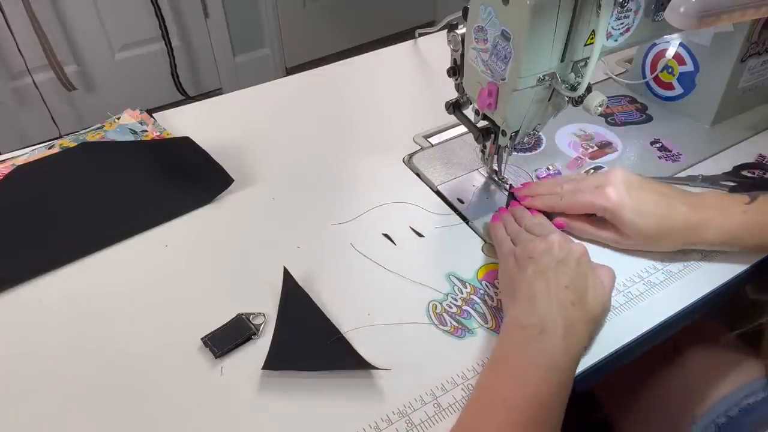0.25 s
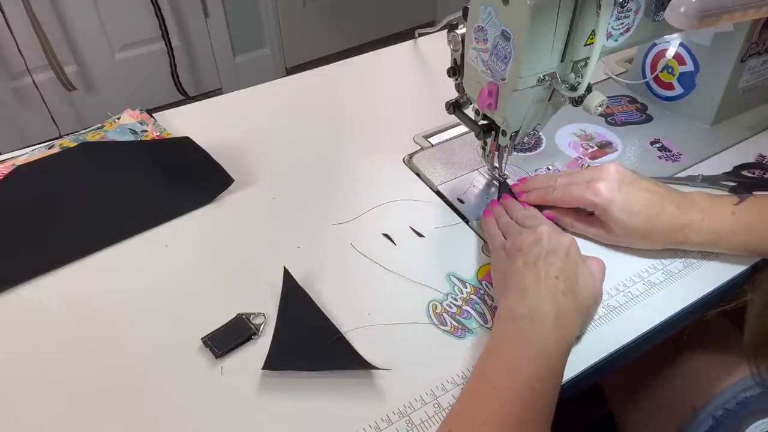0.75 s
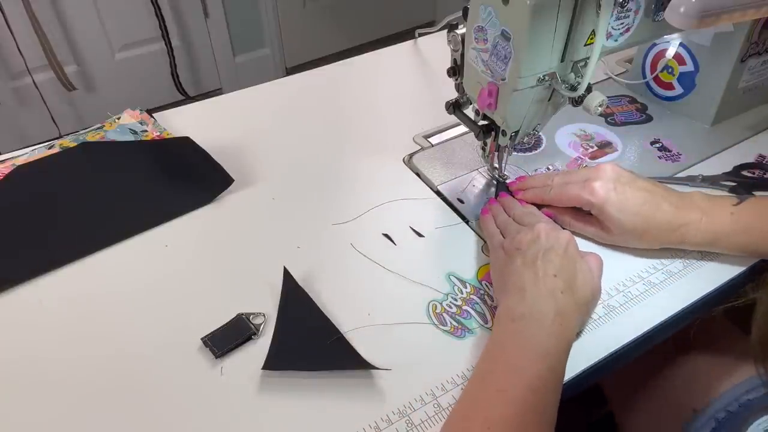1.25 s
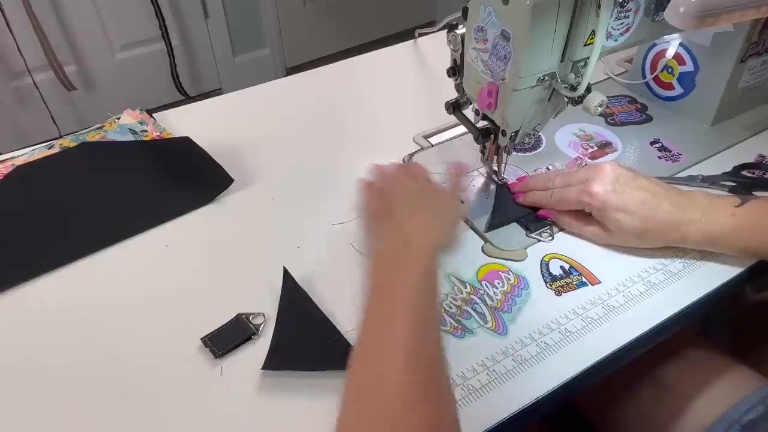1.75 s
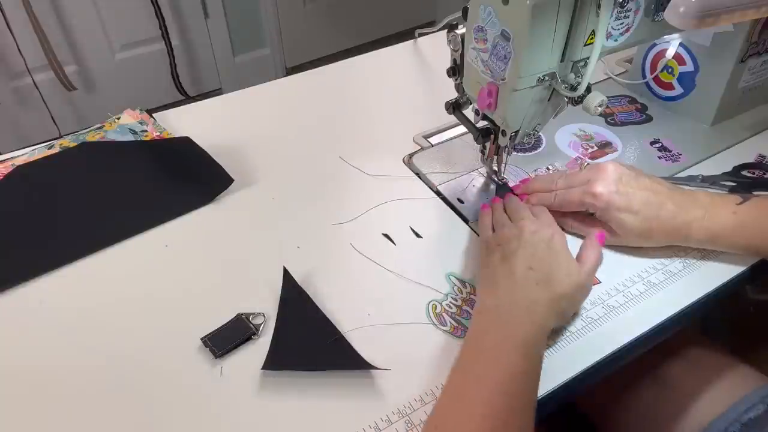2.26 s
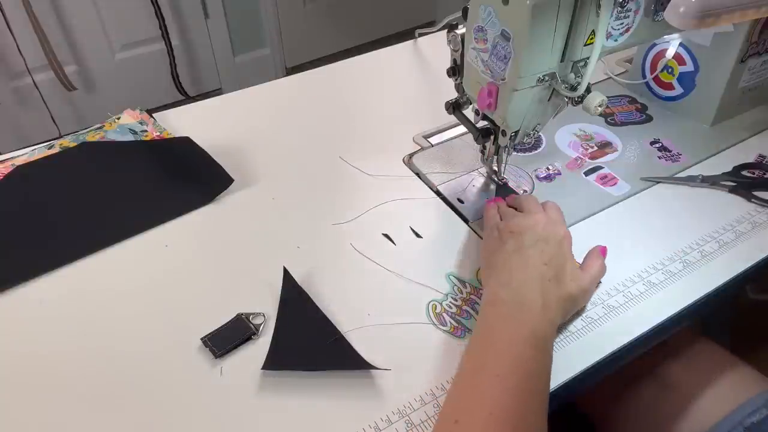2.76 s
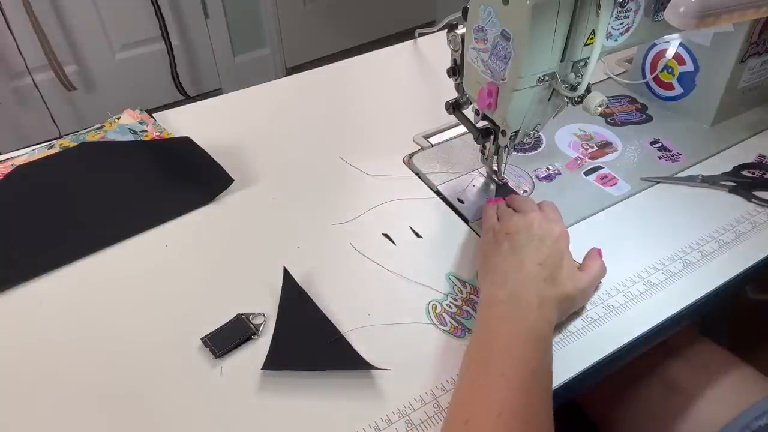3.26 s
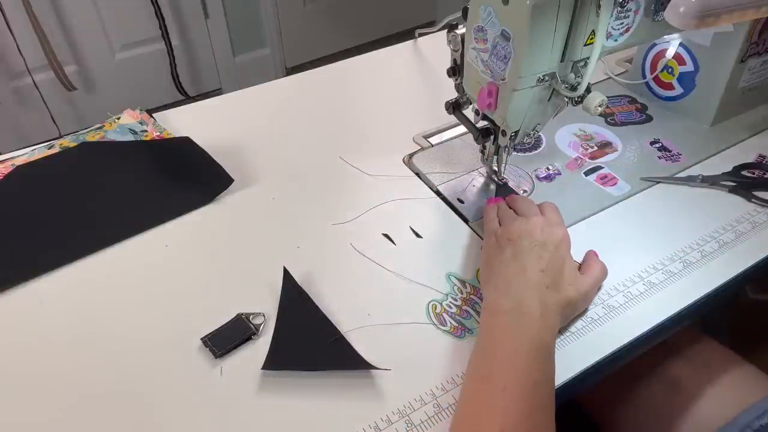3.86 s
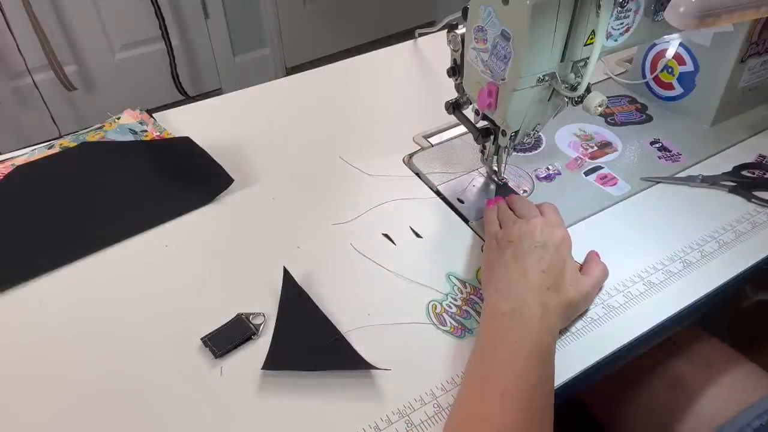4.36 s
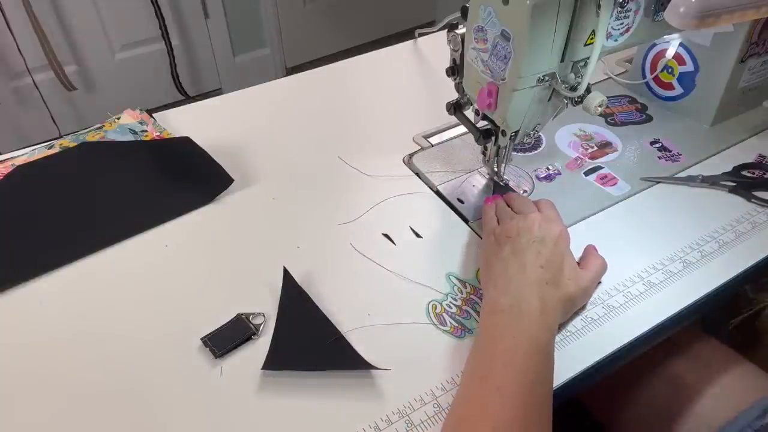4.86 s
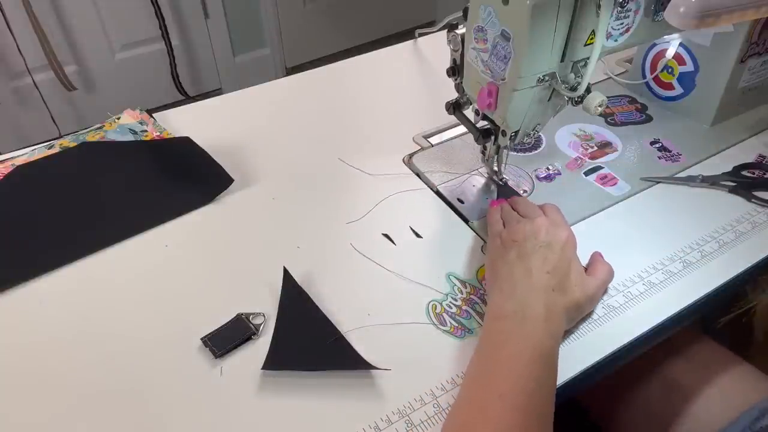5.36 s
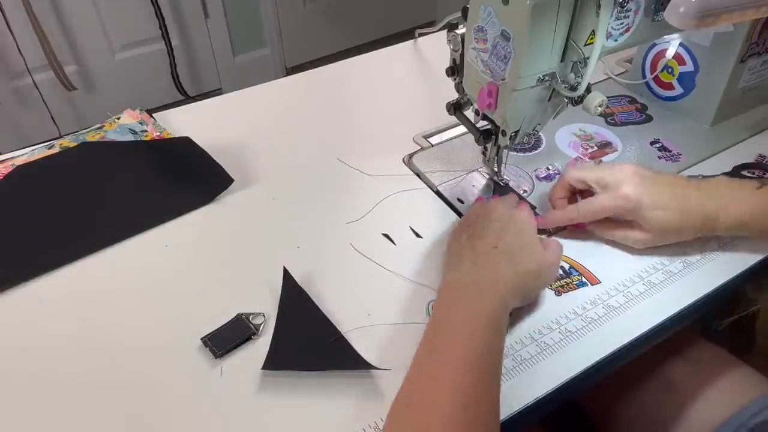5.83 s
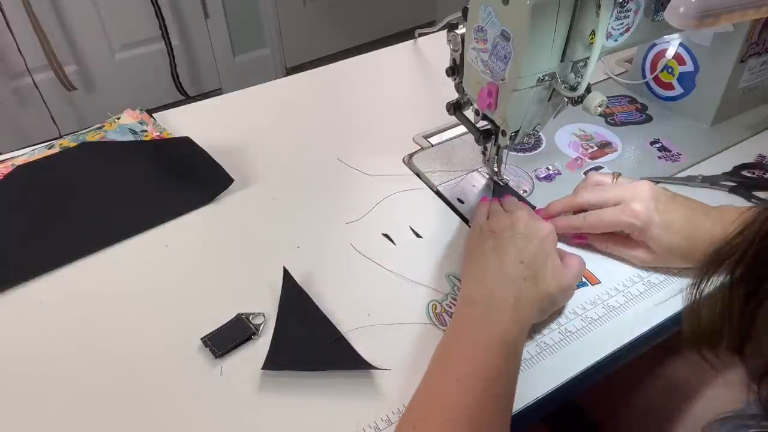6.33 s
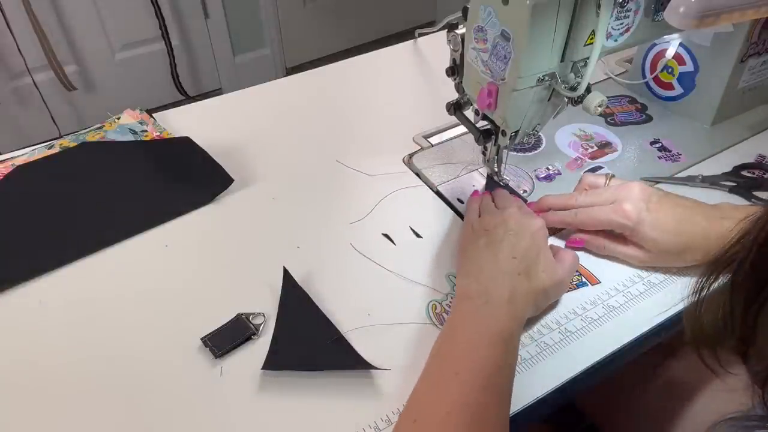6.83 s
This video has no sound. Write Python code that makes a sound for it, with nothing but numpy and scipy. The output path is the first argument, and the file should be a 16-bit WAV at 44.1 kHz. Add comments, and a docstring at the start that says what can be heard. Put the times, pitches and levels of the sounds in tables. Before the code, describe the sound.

Quiet room rumble and motor hum, heard by a close stereo microphone at a sewing table. Soft cloth taps and a metal foot clunking down and up come first, then sparse bright clicks, the hardest followed by a short pinging snap. Two bursts of chunky stitching finish the scene, each stroke a knock, tick and table shake with rattling links and tiny thread squeaks; a low brake thump separates them.

```python
"""An industrial sewing machine in a small workroom, heard from just above its table.
Fingers brush cloth (impulse bursts, coloured) as the presser foot drops and lifts (struck modes, groaning linkage).
A hand clicks against the handwheel and a sprung part snaps over (filtered bursts, decaying modes).
Then two slow runs of stitches, a brake thump between: the feed knocks, the hook ticks, the table shakes, links
rattle and thread squeaks (bursts, resonators, grains, chirps). Low rumble and motor hum (noise, sine) throughout."""
import sys
import numpy as np
from scipy import signal
from scipy.fft import rfft, irfft, next_fast_len
from scipy.io import wavfile
from scipy.ndimage import uniform_filter1d

SR = 44100
rng = np.random.default_rng(int(sys.argv[2]) if len(sys.argv) > 2 else 0)


def log_audio(samples):
    """Write samples as a 16-bit WAV file to the path given in sys.argv[1]."""
    # one column per channel
    frames = np.atleast_2d(samples).T
    # limit to full scale, then quantise
    limited = np.clip(frames, -1, 1)
    pcm = np.round(limited * 32767).astype(np.int16)
    wavfile.write(sys.argv[1], SR, pcm)


N = 312669
T = np.arange(N) / SR
SIZE = next_fast_len(N + SR)
HZ = np.arange(SIZE // 2 + 1) * SR / SIZE

# Levels are ahead of each function's gains.
# feed and its drive knocking: t/s, clack level/dB, table thud level/dB, clack pitch f/Hz
FEED_KNOCKS = [(4.18,-53,-61,450), (4.551,-41.5,-39,1700), (4.734,-36.5,-40,1450), (4.781,-31.5,-38.5,2090),
               (4.918,-37,-40,1660), (5.102,-36,-44,1810), (5.283,-34.5,-38,780), (5.465,-36,-37.5,1390),
               (5.678,-42,-48.5,890), (6.398,-46,-42,1020), (6.491,-36,-36,1650), (6.634,-34,-40.5,1570),
               (6.779,-34,-43,1100), (6.919,-32,-39.5,1580), (7.062,-34,-39.5,1690)]
# needle bar bottoming in each stitch: t/s, knock level/dB, deep thump level/dB, knock pitch f/Hz
BAR_PUNCHES = [(4.628,-46.5,-33,950), (4.811,-41.5,-40,690), (4.994,-39.5,-35,834), (5.172,-40.5,-36,1050),
               (5.358,-37.5,-30.5,523), (5.539,-41,-35,970), (6.556,-41.5,-33,960), (6.696,-41.5,-33,1100),
               (6.842,-40,-34.5,620), (6.983,-41,-33.5,900)]
# resonances of the cast head: f/Hz, width/Hz, rel. level/dB
HEAD_PEAKS = [(479,42,6.5), (660,36,10.5), (825,14,10.5), (1009,9.7,9), (1100,82,0.5), (1398,26,13),
              (1588,87,8), (2330,33,3.5)]
# low ring of small steel parts: f/Hz, width/Hz, rel. level/dB
LOW_RING_PEAKS = [(1750,740,-11), (2297,130,-1), (2640,280,-2.5), (3120,300,1.5), (3554,200,-1),
                  (4400,320,-10.5)]
# spectrum of a sharp steel contact: f/Hz, rel. level/dB
STEEL_SPECTRUM = [(400, -16), (1500, -10), (3000, -5.5), (5000, 2.5), (6700, 0), (8200, -11), (9300, -4.5),
                  (12800, -15), (13800, -5.5), (15000, -25.5)]


def undb(db):
    """Decibels to gain."""
    return 10 ** (np.asarray(db) / 20)


def unit(x):
    """Scale to rms 1."""
    return x / np.sqrt(np.mean(x ** 2))


def slope(points):
    """Values over frequency, joined on a log axis."""
    hz, value = np.transpose(points)
    return np.interp(np.log(HZ + 1), np.log(hz), value)


def through(x, response):
    """Filter by a frequency response."""
    return irfft(rfft(x, SIZE) * response, SIZE)[..., :N]


def unit_power(response):
    """Rms gain of a response on white noise."""
    return np.sqrt(np.mean(abs(response) ** 2))


def colour(x, points):
    """Causal (minimum-phase) filter with the given spectrum shape and unit power gain."""
    cepstrum = irfft(np.log(undb(slope(points))), SIZE)
    response = np.exp(rfft(2 * cepstrum[:SIZE // 2], SIZE))
    return through(x, response / unit_power(response))


def resonate(x, peaks):
    """Parallel resonances of alternating sign, unit power gain."""
    response = 0
    for k, (hz, width_hz, db) in enumerate(peaks):
        damping = 1j * HZ * width_hz
        response = response + (-1) ** k * undb(db) * damping / (hz ** 2 - HZ ** 2 + damping)
    return through(x, response / unit_power(response))


def blows(times_s, db, decay_ms, rise=1.0, chatter_db=0):
    """Each contact is a noise burst, even over frequency, that builds for a share of its decay time and dies away."""
    out = np.zeros(N + SR)
    lead = SR // 100  # samples ahead of the contact
    t = np.maximum(T[:SR // 2] - T[lead], 0)
    for s, gain, ms in np.broadcast(times_s, undb(db), decay_ms):
        age = t * 1000 / ms
        chatter = undb(chatter_db * unit(uniform_filter1d(rng.standard_normal(len(t)), size=70)))
        envelope = chatter * np.exp(-age) * (1 - np.exp(-age / rise))
        spectrum = rfft(envelope * rng.standard_normal(len(t)))
        power = uniform_filter1d(abs(spectrum) ** 2, size=600)
        burst = irfft(spectrum / np.sqrt(power), len(t))
        # energy of a plain decay, whatever the rise
        scale = np.linalg.norm(np.exp(-age[lead:])) / np.linalg.norm(burst)
        out[int(s * SR) - lead:][:len(t)] += gain * burst * scale
    return out[:N]


def pitched(times_s, db, decay_ms, hz, width_hz):
    """Blows that each ring at a pitch of their own, with unit power gain."""
    rings = 0
    for s, level_db, ms, f in np.broadcast(times_s, db, decay_ms, hz):
        b, a = signal.iirpeak(f, f / width_hz, fs=SR)
        rings = rings + signal.lfilter(b, a, blows([s], level_db, ms, rise=0.27))
    return rings * np.sqrt(SR / (np.pi * width_hz))


def pushes(times_s, db):
    """One clean impulse for each blow."""
    samples = (np.atleast_1d(times_s) * SR).astype(int)
    return np.bincount(samples, np.atleast_1d(undb(db)), N)[:N]


def ring(x, modes):
    """Decaying modes of a struck part."""
    t = T[:SR]
    tone = sum(undb(db - 60 * t / t60_s) * np.sin(2 * np.pi * hz * t) for hz, db, t60_s in modes)
    return through(x, rfft(tone, SIZE))


def feed(clack_ms=8, clack_db=-3, head_db=-7, dull_hz=2200, link_db=-7, link_width_hz=160, bar_db=-2, bar_width_hz=260):
    """The feed clacks, the needle bar knocks duller; both ring the cast head, at a pitch shifting from stroke to stroke."""
    # clack: f/Hz, rel. level/dB
    clack_spectrum = [(400,-2), (1600,1), (2500,1.5), (5500,-11.5), (7000,-13), (8200,-26.5), (13300,-14),
                      (15000,-45)]
    feed_s, feed_db, _, feed_hz = np.transpose(FEED_KNOCKS)
    punch_s, punch_db, _, punch_hz = np.transpose(BAR_PUNCHES)
    punches = blows(punch_s, punch_db, clack_ms, rise=0.17, chatter_db=4.5)
    punches = through(punches, 1 / (1 + 1j * HZ / dull_hz))
    hits = blows(feed_s, feed_db, clack_ms, rise=0.29, chatter_db=1.5) + punches
    links = pitched(feed_s, feed_db + link_db, clack_ms, feed_hz, link_width_hz)
    bar = pitched(punch_s, punch_db + bar_db, clack_ms, punch_hz, bar_width_hz)
    clack = undb(clack_db) * colour(hits, clack_spectrum)
    return clack + undb(head_db) * resonate(hits, HEAD_PEAKS) + links + bar


def needle(tick_ms=1.45, tick_db=2.5, ring_db=-1, tip_db=-6):
    """Sharp steel ticks with a low and a very high ring; the needle bar rings on after each."""
    # ticks of hook and needle, hardest in thick cloth: t/s, level/dB, low (3 kHz) ring rel. level/dB
    ticks = [(4.31,-40,-3), (4.392,-39,-3), (4.532,-47,-5), (4.591,-35.5,-17), (4.644,-49.5,9),
             (4.775,-31,-24), (4.782,-38,11.5), (4.9593,-36,-12), (5.144,-46,-15), (5.191,-46,-3),
             (5.276,-34,8), (5.316,-30,-21), (5.523,-33.5,-1), (6.244,-43,-4), (6.354,-39.5,-0.5),
             (6.552,-34.5,-13), (6.673,-39,0), (6.835,-34.5,-9), (6.958,-36.5,-1)]
    # very high ring: f/Hz, width/Hz, rel. level/dB
    tip_peaks = [(9500, 700, -1.5), (12420, 260, -1)]
    # needle bar, lowest modes a beating pair: f/Hz, level/dB, t60/s
    bar_modes = [(2217,-20,0.24), (2235,-19,0.22), (4700,-18.5,0.12)]
    s, db, low_db = np.transpose(ticks)
    hits = blows(s, db, tick_ms, rise=0.078)
    tip = resonate(blows(s, db + tip_db, tick_ms, rise=0.15), tip_peaks)
    low = resonate(blows(s, db + low_db + ring_db, tick_ms, rise=0.084), LOW_RING_PEAKS)
    return undb(tick_db) * colour(hits, STEEL_SPECTRUM) + tip + low + ring(pushes(s, db), bar_modes)


def table(knock_db=26, punch_db=23, thump_db=20, lag_s=0.00901, rumble_db=-3):
    """Knocks and the belt drive shake the table top; each punch also thumps the stand."""
    # belt drive rumble: t/s, level/dB
    drive_levels = [(4.18,-61.5), (4.4,-54.5), (4.75,-47), (5.42,-53), (5.8,-57), (5.9,-95), (6.2,-65.5),
                    (6.43,-52), (7.09,-42.5)]
    # table top resonances: f/Hz, width/Hz, rel. level/dB
    table_peaks = [(100.4, 27, -5.5), (117.7, 16, -3), (163, 8.8, 0), (214, 29, -7.5), (245.5, 9.8, 3),
                   (316.7, 26, -3.5)]
    # stand resonances: f/Hz, width/Hz, rel. level/dB
    stand_peaks = [(66,33,-5), (97.6,23.5,2), (123,20,0.5), (176,51,0)]
    feed_s, _, thud_db, _ = np.transpose(FEED_KNOCKS)
    punch_s, bar_db, deep_db, _ = np.transpose(BAR_PUNCHES)
    drive_db = np.interp(T, *np.transpose(drive_levels), left=-120)
    rumble = undb(rumble_db + drive_db) * rng.standard_normal(N)
    force = pushes(feed_s, knock_db + thud_db) + pushes(punch_s + lag_s, punch_db + bar_db) + rumble
    thumps = pushes(punch_s + lag_s, thump_db + deep_db)
    shake = resonate(force, table_peaks) + resonate(thumps, stand_peaks)
    return through(shake, 1 / (1 + 1j * HZ / 700) ** 2)


def shaft(start_s, full_s, stroke_s, braking_s, stitch_hz):
    """Turns of the main shaft and the effort behind them: it builds, holds, then falls with the speed."""
    start_db, spin_up_s = -18.5, 0.069  # effort as the motor starts; swell as the shafts begin to turn
    brake_s, brake_power = 0.09, 0.6  # time to stand still; effort follows speed to this power
    slowing_s = np.clip(T - braking_s, 0, brake_s)
    turning_s = np.minimum(T, braking_s) - stroke_s + slowing_s - slowing_s ** 2 / (2 * brake_s)
    shortfall = np.clip((full_s - T) / (full_s - start_s), 0, 1)
    build = np.clip((T - start_s) / spin_up_s, 0, 1) * undb(start_db * shortfall)
    return stitch_hz * turning_s, build * (1 - slowing_s / brake_s) ** brake_power


def running():
    """Gain of the turning shafts: it follows the effort and swells once a stitch."""
    # runs of stitching: motor start t/s, full effort t/s, one feed stroke t/s, braking start t/s, stitch rate f/Hz
    runs = [(4.15, 4.602, 4.548, 5.59, 5.43), (6.163, 6.463, 7.48, 10, 7)]
    mean_db, swing_db, loudest_turn = -54, 5.5, 0.14  # last: share of a turn
    gain = 0
    for run in runs:
        turns, effort = shaft(*run)
        gain = gain + effort * undb(mean_db + swing_db * np.cos(2 * np.pi * (turns - loudest_turn)))
    return gain


def shafts(grains_per_s=300, scatter_db=5.0, whirr_db=-4, head_db=-10):
    """Play in the bearings and links makes a dense, fine rattle of random grains."""
    # whirr: f/Hz, rel. level/dB
    whirr_spectrum = [(100,-7.5), (400,9), (1000,1), (2200,3), (4700,1.5), (8200,-9.5), (9500,-8.5),
                      (13700,-6), (14800,-38.5)]
    struck = rng.random(N) < grains_per_s / SR
    grains = struck * rng.standard_normal(N) * undb(scatter_db * rng.standard_normal(N))
    rattle = unit(grains) * running()
    return undb(whirr_db) * colour(rattle, whirr_spectrum) + undb(head_db) * resonate(rattle, HEAD_PEAKS)


def thread(squeak_hz=4660, length_s=0.0072, rough_rad=0.102):
    """Short, slightly rough stick-slip chirps as the thread is drawn up tight."""
    # squeaks: t/s, level/dB
    squeaks = [(4.574,-53), (4.761,-45.5), (4.946,-45.5), (5.13,-54), (5.503,-47), (6.531,-45.5),
               (6.678,-47), (6.957,-43.5)]
    phase = np.cumsum(2 * np.pi * squeak_hz / SR + rough_rad * rng.standard_normal(N))
    return np.sin(phase) * sum(undb(db) * np.exp(-((T - s) / length_s) ** 2) for s, db in squeaks)


def brake(stop_s=5.722, stop_db=-38):
    """The brake thumps the table as the first run stops; the stand rings in decaying modes."""
    # stand under the brake: f/Hz, rel. level/dB, t60/s
    stop_modes = [(185, -6, 0.22), (157.7, -9.5, 0.48), (321, -4.5, 0.11)]
    return ring(pushes(stop_s, stop_db), stop_modes)


def handwheel(spot_db=-4, spot_width_hz=300):
    """Small hard contacts, each a crack with a low and a high ring and a narrow ping from the spot struck."""
    # clicks: t/s, low ring level/dB, high ring level/dB, broad crack level/dB, contact/ms, spot pitch f/Hz
    clicks = [(2.781,-30,-27,-54.5,0.6,2390), (2.830,-36,-22,-38.5,0.62,7250),
              (2.992,-46.5,-45,-63,0.26,3180), (3.026,-53,-27.5,-36,0.28,5780),
              (3.242,-31.5,-50,-50.5,0.31,5160), (3.27,-37.5,-36.5,-29.5,0.64,2700),
              (3.273,-23,-25.5,-23,0.83,3090)]
    # high ring: f/Hz, width/Hz, rel. level/dB
    high_peaks = [(5700, 500, 2), (6400, 930, -2), (7250, 80, 2), (9640, 430, -10.5), (11000, 4200, -12.5),
                  (13180, 870, -7.5)]
    # hard contact: f/Hz, rel. level/dB
    crack_spectrum = [(500,-25.5), (1500,-9), (4300,-0.5), (6000,-6), (12000,-7.5), (16000,-34)]
    s, low_db, high_db, crack_db, ms, hz = np.transpose(clicks)
    low = resonate(blows(s, low_db, ms, rise=0.35), LOW_RING_PEAKS)
    high = resonate(blows(s, high_db, ms, rise=0.93), high_peaks)
    pings = pitched(s, np.maximum(low_db, high_db) + spot_db, ms, hz, spot_width_hz)
    rings = through(low + high + pings, (1j * HZ / (1200 + 1j * HZ)) ** 2)
    return rings + colour(blows(s, crack_db, ms, rise=0.82), crack_spectrum)


def latch(snap_s=3.537, ring_db=-51, tick_db=-46, tick_ms=2.4, knock_db=-57, knock_ms=25):
    """A sprung part snaps over with a dull knock and a short ping as the wheel is turned."""
    # sprung part: f/Hz, rel. level/dB, t60/s
    latch_modes = [(165,-2,0.2), (303.6,0.5,0.37), (465,0.5,0.11), (790,-9.5,0.18), (1136,-1,0.11),
                   (2261,-8,0.12), (3440,-2,0.016), (5132,4.5,0.075), (8700,1.5,0.12), (11400,12.5,0.005)]
    ping = ring(pushes(snap_s, ring_db), latch_modes)
    knock = pitched([snap_s], knock_db, knock_ms, hz=302, width_hz=220)
    return ping + knock + colour(blows([snap_s], tick_db, tick_ms), STEEL_SPECTRUM)


def presser_foot(clash_ms=11, clash_db=-2, groan_hz=117, groan_width_hz=5):
    """The foot thumps on the bed with a clash of metal; its sprung linkage groans at each push of the knee."""
    # foot and lever landing: t/s, thump level/dB, blow centre f/Hz, metal clash level/dB
    landings = [(0.110,-39.5,500,-70), (0.159,-36,1480,-48), (1.344,-44.5,220,-76), (1.4208,-40.5,740,-36),
                (1.427,-34.5,410,-36.5)]
    # foot: f/Hz, rel. level/dB, t60/s
    foot_modes = [(144,-19,0.78), (321.3,2.5,0.14), (355.5,-3.5,0.18), (458,-3,0.032), (610,-4.5,0.045),
                  (684,1,0.098), (1154,-6.5,0.024), (1690,-16,0.052)]
    # clash: f/Hz, rel. level/dB
    clash_spectrum = [(200,-38.5), (600,21), (1300,4.5), (3000,13), (4300,8), (5000,0.5), (8200,-9.5),
                      (11500,-16), (16000,-76)]
    # linkage groans: t/s, length/s, level/dB
    groans = [(0.086, 0.13, -53), (0.23, 0.07, -50.5), (1.204, 0.11, -47), (1.301, 0.048, -46.5)]
    s, _, _, metal_db = np.transpose(landings)
    force = 0
    for at_s, db, hz, _ in landings:
        # a soft landing drives the low modes, a hard one the high modes
        ratio = HZ / hz
        force = force + through(pushes(at_s, db), 1j * ratio / (1 + 1j * ratio - ratio ** 2))
    clash = colour(blows(s, metal_db + clash_db, clash_ms, rise=0.052), clash_spectrum)
    waver = unit(uniform_filter1d(rng.standard_normal(N), size=2000))
    groan = np.sin(2 * np.pi * np.cumsum(groan_hz + groan_width_hz * waver) / SR)
    swells = sum(undb(db) * np.sin(np.pi * np.clip((T - at_s) / length_s, 0, 1)) for at_s, length_s, db in groans)
    return ring(force, foot_modes) + clash + groan * swells


def cloth(cloth_db=-1.5, catch_db=5):
    """Fingers slide and tap the fabric, catching unevenly on the weave; a nail may graze the plate."""
    # touches: t/s, level/dB, decay/ms, nail on steel rel. level/dB
    touches = [(0.044,-58.5,52,-1.5), (0.048,-45.5,6,-3), (0.307,-54.5,9.3,-15), (0.371,-52.5,2.4,-7),
               (0.441,-53.5,8.7,-10), (0.491,-64,35,-26), (0.739,-73.5,42,-13), (1.2,-69.5,36,-2.5),
               (1.339,-53,5.8,-24), (1.351,-66.5,2.2,10.5), (1.59,-50,9.2,-1.5), (2.078,-72,8.5,-2),
               (2.142,-70,0.59,15), (2.364,-71.5,12.6,6), (2.48,-63,6.3,2), (5.931,-66.5,12,-11),
               (6.027,-53.5,0.9,-4.5)]
    # fabric: f/Hz, rel. level/dB
    cloth_spectrum = [(700,4), (1800,7), (3500,0), (6000,-13.5), (8200,-28.5), (10000,-9.5), (15000,-40)]
    s, db, ms, nail_db = np.transpose(touches)
    catches = undb(catch_db * unit(uniform_filter1d(rng.standard_normal(N), size=500)))
    fabric = colour(blows(s, db, ms) * catches, cloth_spectrum)
    nail = colour(blows(s, db + nail_db, ms), STEEL_SPECTRUM)
    return undb(cloth_db) * (fabric + nail)


def diffuse(wide_hz=480):
    """Noise from all sides: alike in both ears in the bass, unrelated above."""
    mid, side = rng.standard_normal((2, N))
    spread = np.minimum(HZ / wide_hz, 1) ** 0.63
    pair = mid + np.array([[1], [-1]]) * through(side, spread)
    return through(pair, 1 / np.sqrt(1 + spread ** 2))


def workroom(build_s=0.0019):
    """Response of the room: a diffuse tail, each band with its own decay, evenly loud over frequency."""
    # room decay: f/Hz, t60/s
    decays = [(300, 0.34), (1500, 0.31), (6000, 0.26), (14000, 0.15)]
    noise, tail = diffuse(), 0
    for hz, t60_s in decays:
        band = slope([(f, float(f == hz)) for f, _ in decays])
        tail = tail + through(noise, band) * undb(-60 * np.minimum(T / t60_s, 4))
    response = rfft(tail * (1 - np.exp(-(T / build_s) ** 2)), SIZE)
    power = uniform_filter1d(abs(response) ** 2, size=300, axis=-1)
    even = irfft(response / np.sqrt(power), SIZE)
    return rfft(even[:, :SR], SIZE)


def place(x, room, room_db, lag_ms=.18, right_db=0):
    """Direct sound from the right, reaching the left port later, plus the room."""
    lag_s = np.array([[lag_ms / 1000], [0]])
    gain = undb(np.array([[-.5], [.5]]) * right_db)
    direct = gain * np.exp(-2j * np.pi * HZ * lag_s)
    return through(x, direct + undb(room_db) * room)


def background(air_db=-62, hum_hz=59.9, hum_db=-70):
    """Low room rumble (coloured diffuse noise) and the hum of the waiting motor (a sine)."""
    # rumble: f/Hz, rel. level/dB
    air_spectrum = [(15,-46), (25,-17.5), (60,-0.5), (87,-10.5), (157,-8), (290,-17), (985,-38),
                    (8290,-49.5), (10800,-47.5), (14500,-60)]
    rumble = undb(air_db) * unit(colour(diffuse(wide_hz=746), air_spectrum))
    return rumble + undb(hum_db) * np.sin(2 * np.pi * hum_hz * T)


def scene():
    """Bed, head and stand sit at different spots, so each reaches the walls by its own paths."""
    bed, head, stand = workroom(), workroom(), workroom()
    stitching = place(feed(), bed, room_db=-0.5)
    stitching += place(shafts(), stand, room_db=5.5)
    stitching += place(needle() + thread(), head, room_db=2.0)
    drive = place(table() + brake(), stand, room_db=-0.5)
    wheel = place(handwheel(), stand, room_db=-3.5, lag_ms=0.318, right_db=2.0)
    wheel += place(latch(), head, room_db=-2, lag_ms=0.345)
    handling = place(presser_foot(), head, room_db=1.0) + place(cloth(), bed, room_db=4.5)
    return stitching + drive + wheel + handling + background()


def record(dry):
    """The right port hears the mids a little louder; the deepest bass and the top are cut."""
    # left minus right: f/Hz, level/dB
    tilt = [(200, 0), (380, -0.5), (700, -3), (1290, -1), (2380, 0), (4400, -3.5), (8120, -1.5),
            (12000, 0.5)]
    low_hz, top_hz = 33, 15900
    ports = through(dry, undb(np.array([[.5], [-.5]]) * slope(tilt)))
    ports = signal.sosfilt(signal.butter(4, low_hz, "high", fs=SR, output="sos"), ports)
    return signal.sosfilt(signal.ellip(8, .2, 70, top_hz, fs=SR, output="sos"), ports)


dry = scene()
out = record(dry)
log_audio(out)
```